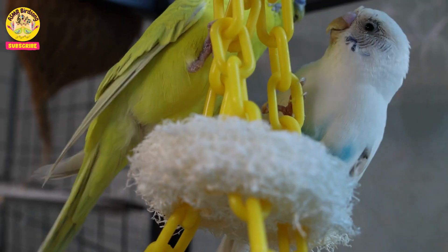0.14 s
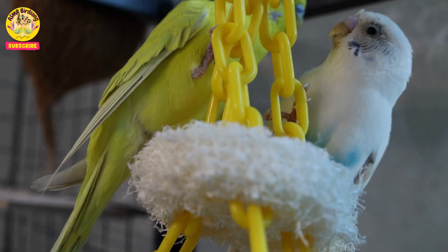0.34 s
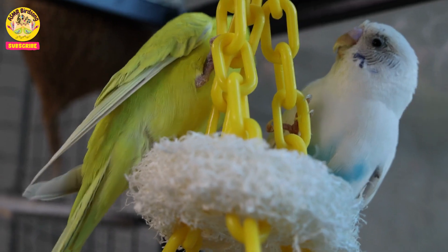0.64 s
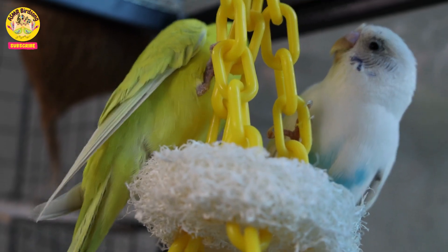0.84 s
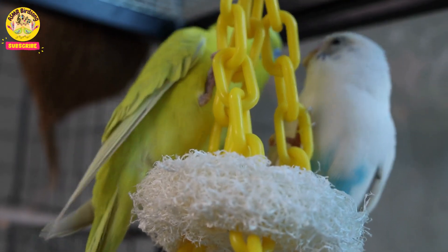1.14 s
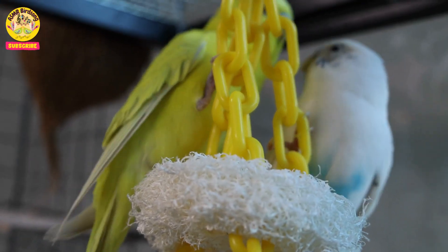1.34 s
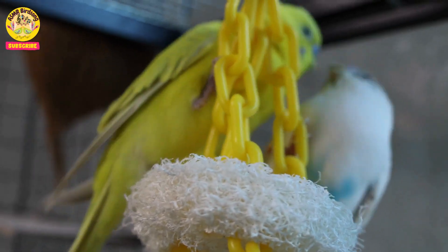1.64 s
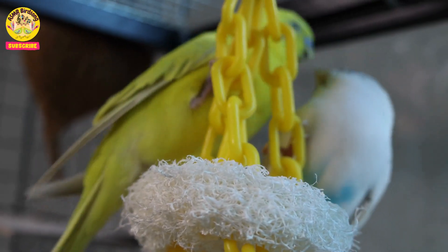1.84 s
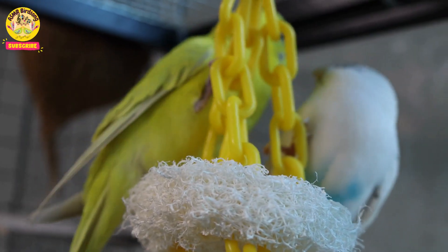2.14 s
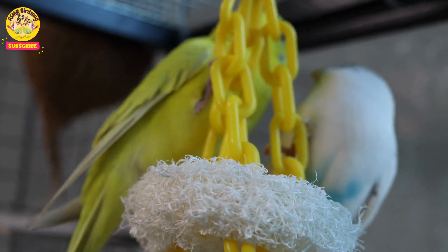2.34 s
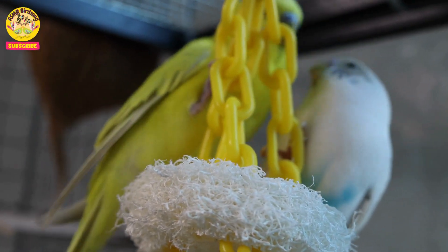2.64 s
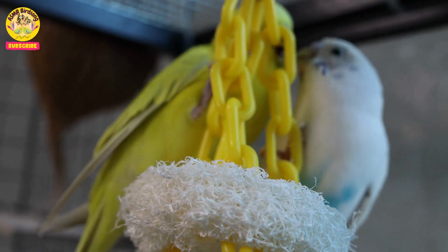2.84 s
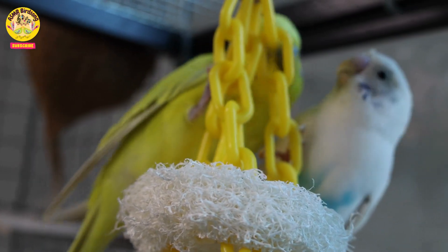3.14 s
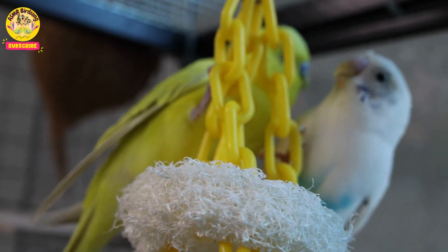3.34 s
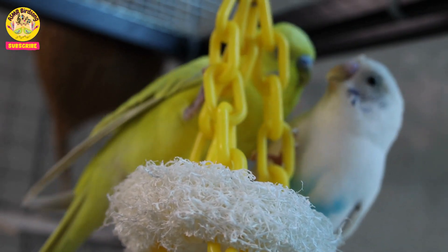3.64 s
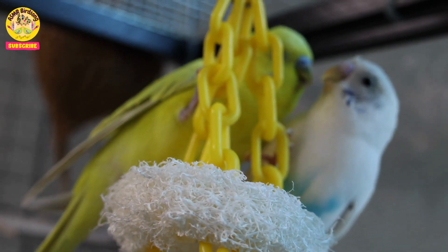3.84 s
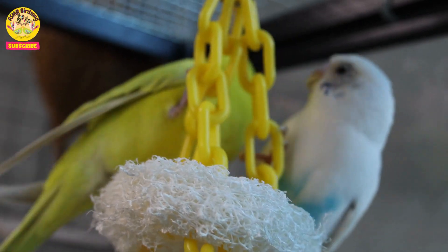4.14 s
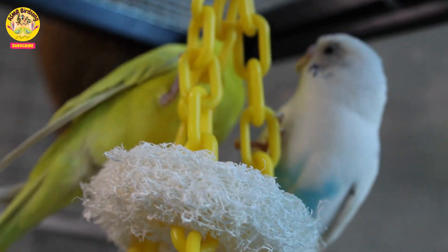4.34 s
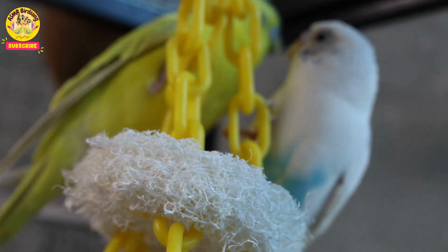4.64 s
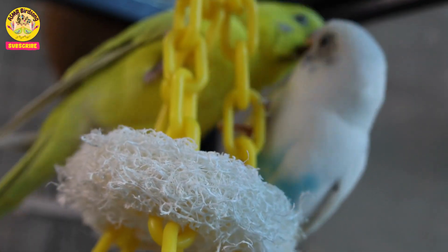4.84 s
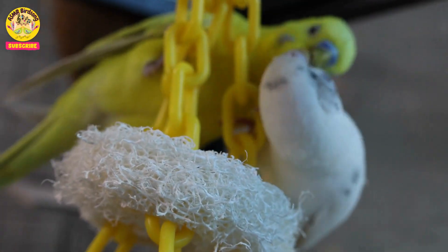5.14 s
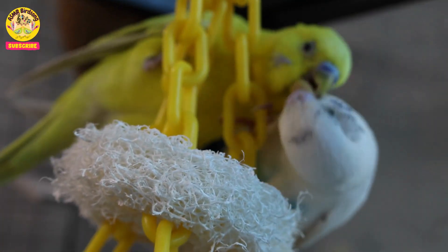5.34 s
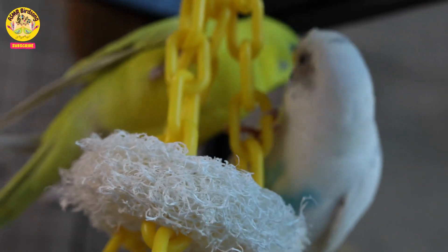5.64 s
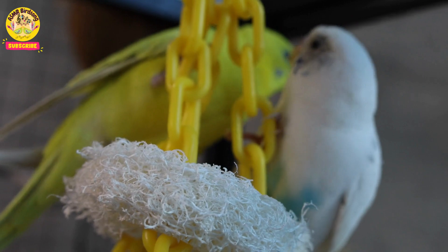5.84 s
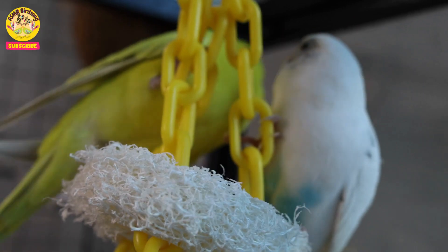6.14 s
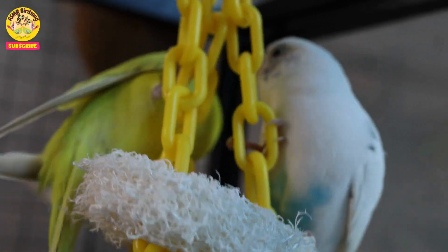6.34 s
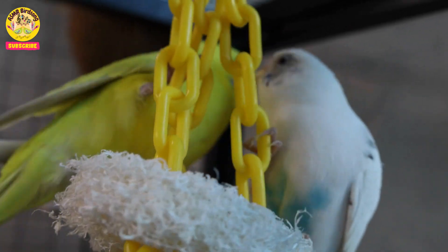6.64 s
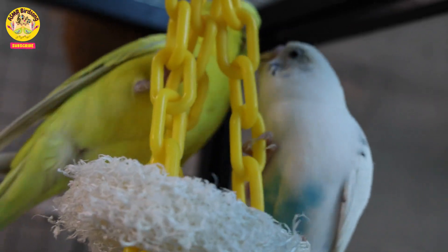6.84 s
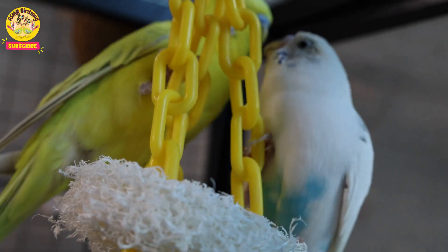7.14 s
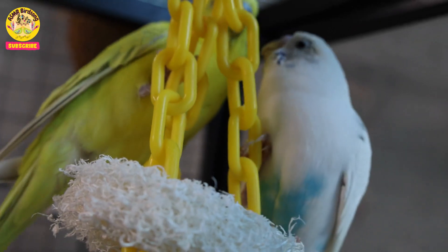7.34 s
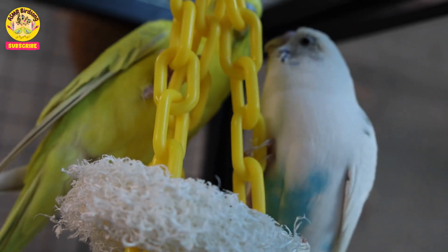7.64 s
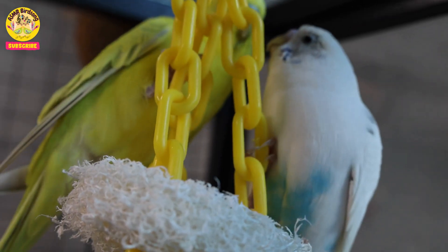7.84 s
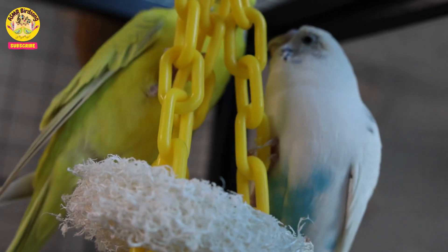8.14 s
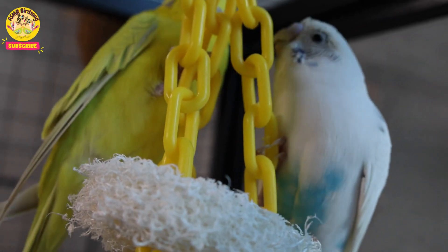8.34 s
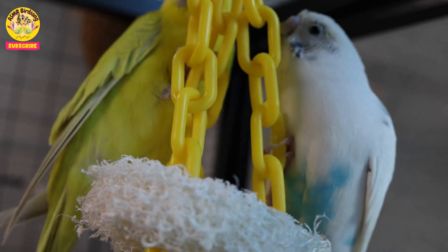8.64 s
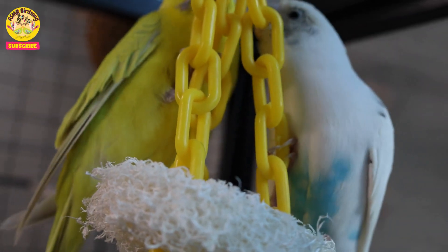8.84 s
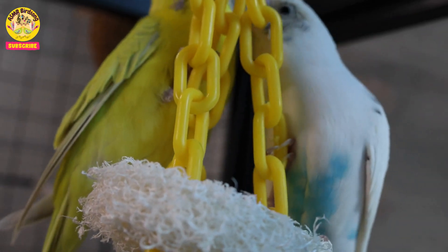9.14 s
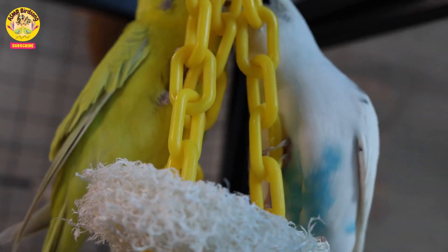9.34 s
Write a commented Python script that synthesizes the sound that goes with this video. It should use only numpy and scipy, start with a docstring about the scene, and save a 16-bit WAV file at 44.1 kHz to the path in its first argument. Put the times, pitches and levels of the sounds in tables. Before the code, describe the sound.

Close, nearly mono sound of small cage birds over low rumble and dull rustling. Sliding chirps come first, then bright, fast whistles with sharp dry clicks between them. After a squawk the voices pause and shuffling takes over. Low nasal babble returns with soft deep thumps of the perch, followed by three short raspy cracks and little clicking runs, with a short room echo.

```python
"""Two budgerigars warble close to a microphone, on a hanging toy in their cage, in a quiet ringing room.
Falling slides open over a low rustle and rumble of coloured noise; dry clicks (short filtered noise puffs) and
soft perch bumps (low dying sines) soon join and return. Grunts, arched chatter, a recurring whistle and freer
whistles follow in quick bouts, then a squawk halfway; all are gliding harmonic tones made hoarse with noise.
Late on come three harsh rasps, uneven pulse trains that ring resonances; the last clicks rattle at the end."""
import sys
import numpy as np
from scipy import signal
from scipy.fft import rfft, irfft, next_fast_len
from scipy.io import wavfile
from scipy.ndimage import map_coordinates

SR = 44100
rng = np.random.default_rng(int(sys.argv[2]) if len(sys.argv) > 2 else 0)


def unload_audio(sound):
    """Save the sound as a 16-bit wav file, at the path given as the first command line argument."""
    columns = np.transpose(np.atleast_2d(sound))
    # keep every value between -1 and 1, then stretch to whole-number steps
    steps = np.round(np.clip(columns, -1, 1) * 32767)
    wavfile.write(sys.argv[1], SR, steps.astype(np.int16))


N = 418509
TOP_HZ = 16300  # nothing sounds above this


def amp(db):
    """Decibels to gain."""
    return 10 ** (np.asarray(db) / 20)


def unit(x):
    """x at rms 1."""
    return x / np.sqrt(np.mean(x ** 2) + 1e-20)


def along(points, hz):
    """(Hz, value) points read on a log frequency axis."""
    f, v = np.transpose(points)
    return np.interp(np.log(hz + 1), np.log(f + 1), v)


def at_time(points, s):
    """(x, value) points read on a straight axis, such as time."""
    return np.interp(s, *np.transpose(points))


def curve(points):
    """(s, value) points drawn out to one value per sample."""
    return at_time(points, np.arange(N) / SR)


def wobble(rate, size):
    """A smooth random curve, rate knots a second."""
    knots = rng.standard_normal(int(size * rate / SR) + 4)
    return map_coordinates(knots, [np.arange(size) * rate / SR])


def add(track, s, x):
    """Mix x into the track at time s."""
    part = track[max(round(s * SR), 0):][:len(x)]
    part += x[:len(part)]


def filtered(x, response):
    """x times a response of frequency."""
    m = next_fast_len(N + 8192)
    return irfft(rfft(x, m) * response(np.fft.rfftfreq(m, 1 / SR)), m)[..., :N]


def noise(colour):
    """Coloured noise of rms 1."""
    return unit(filtered(rng.standard_normal(N), lambda hz: amp(along(colour, hz))))


def ring(colour, size=256):
    """The causal, minimum-phase impulse response of a colour, by folding its cepstrum."""
    cepstrum = irfft(np.log(amp(along(colour, np.fft.rfftfreq(size, 1 / SR))) + 1e-6))
    cepstrum[1:size // 2] *= 2
    cepstrum[size // 2 + 1:] = 0
    return irfft(np.exp(rfft(cepstrum)))


def progress(length):
    """Runs from 0 to 1 over length seconds."""
    return np.linspace(0, 1, max(int(length * SR), 64))


def effort(glide, db_per_octave):
    """Level in dB: the bird pushes hardest at its highest pitch."""
    return db_per_octave * np.log2(glide / glide.max())


def sing(s, glide, level_db, overtones_db, rough, hiss_db=-36,
         waver=0.011, quaver=0.051, jitter=0.13, jitter_rate=900,
         shimmer_db=3, flutter_db=1.68, hoarse_db=-4, airy_db=-30, attack=0.00094, release=0.0041):
    """One syrinx note: a gliding harmonic tone that turns hoarse when the membrane beats unevenly."""
    # treble of the voice: (time [s], level [dB])
    treble = [(0, 4), (.4, -2.5), (.9, 4), (1.5, -8.5), (1.9, 3), (2.5, 0), (3.25, 10), (3.5, 0), (4, 2.5),
              (4.7, 6), (6.9, 7), (7.3, -6), (7.5, -16.5), (8, -5.5)]
    # strength of a partial by where it falls in the throat's passband: (frequency [Hz], level [dB])
    partials = [(600, -0.5), (1050, -0.5), (1400, -5), (2200, 1.5), (3250, 0.5), (4050, -10.5),
                (4800, -20.5), (6000, -21), (7000, -32), (8500, -36), (10500, -41.5), (16000, -54.5)]
    # how the throat colours hoarse noise: (frequency [Hz], level [dB])
    throat = [(400, -17), (1200, -8.5), (2100, 15.5), (3200, 16), (4150, 9), (4900, -10), (6200, -15),
              (8000, -22), (11000, -38.5), (16000, -58.5)]
    # air hissing past the beak: (frequency [Hz], level [dB])
    air_colour = [(1000, -37), (3000, 2.5), (6000, 5), (8000, -12.5), (11000, -14), (16000, -16.5)]

    # hold the last values through part of the release
    overhang = int(0.75 * release * SR)
    glide, level_db, overtones_db, rough = (
        np.pad(np.broadcast_to(c, glide.shape), (0, overhang), 'edge')
        for c in (glide, level_db, overtones_db, rough))
    n = len(glide)
    t = np.arange(n) / SR

    slow_wander = (waver + quaver * rough) * wobble(236.2, n)
    fast_jitter = jitter * rough * wobble(jitter_rate, n)
    phase = 2 * np.pi * np.cumsum(glide * (1 + slow_wander + fast_jitter)) / SR

    treble_db = at_time(treble, s)
    tone = amp(along(partials, glide)) * np.sin(phase)
    # each overtone swells and fades as it glides through the throat's resonances
    for k in range(2, min(int(TOP_HZ / glide.mean()), 14) + 1):
        hz = k * glide
        lift_db = overtones_db * along([(6500, 1), (9000, 0.2)], hz)
        db = lift_db + along(partials, hz) + treble_db * along([(3500, 0.17), (5000, 1)], hz)
        tone += amp(db + flutter_db * wobble(175, n)) * np.sin(k * phase)

    # turbulence passes the membrane in one puff a cycle
    puffs = signal.lfilter(ring(throat), 1, rng.standard_normal(n) * (1 + np.sin(phase)))
    above_pitch = signal.butter(4, 1.13 * glide.min(), 'high', fs=SR, output='sos')
    puffs = signal.sosfilt(above_pitch, puffs)
    tone = unit(tone) + (amp(hoarse_db) * rough + amp(airy_db)) * unit(puffs)
    hiss = unit(signal.lfilter(ring(air_colour), 1, rng.standard_normal(n)))
    tone += amp(hiss_db + treble_db) * hiss

    unsteady = amp(shimmer_db * rough * wobble(571, n) + flutter_db * wobble(175, n))
    gate = np.clip(t / attack, 0, 1) * np.clip((t[-1] - t) / release, 0, 1)
    return s, amp(level_db) * gate * unit(tone * unsteady)


def slides(settle=.036):
    """The pitch falls fast, then settles (time constant in s), and the call fades with it."""
    # (time [s], length [s], first pitch [Hz], last pitch [Hz], level [dB], overtones [dB])
    calls = [(0, 0.066, 1298, 1063, -28.5, 1.5), (.078, .082, 2923, 1127, -9.5, -8.5),
             (0.161, .057, 1090, 1030, -29, -7), (.227, 0.1, 2047, 1233, -22.5, -3.5),
             (0.344, 0.095, 2600, 1327, -15.5, -1.5), (2.423, 0.04, 2330, 1660, -17, -5),
             (3.413, 0.02, 2244, 1776, -15.5, 4), (3.814, .039, 2595, 1966, -9, -2),
             (3.965, 0.016, 2550, 2106, -10, -1), (4.098, 0.021, 2098, 1914, -14, -8.5)]
    for s, length, first_hz, last_hz, db, overtones_db in calls:
        fallen = 1 - np.exp(-length * progress(length) / settle)
        glide = first_hz * (last_hz / first_hz) ** (fallen / fallen[-1])
        level_db = db + effort(glide, db_per_octave=19)
        yield sing(s, glide, level_db, overtones_db, rough=.19, hiss_db=-28.5)


def rustle_level(edge=0.034):
    """Level in dB of the low rustle: each shuffle rises, holds and falls over a light stirring."""
    # rustle between shuffles: (time [s], level before trim [dB])
    stir = [(0, -56), (1.9, -62.5), (2.6, -55.5), (3.6, -50.5), (4.3, -57), (4.8, -55.5), (5.3, -46),
            (6.4, -45), (7.4, -51.5), (7.9, -44), (8.6, -55.5), (9.2, -50), (9.49, -53)]
    # shuffles of the birds on the toy: (time [s], length [s], level before trim [dB])
    shuffles = [(2.593, 0.42, -50), (3.138, .11, -39), (4.866, 0.25, -46.5), (5.169, 0.419, -39),
                (5.622, 0.18, -39), (5.906, .3, -38), (6.123, 0.077, -32), (6.532, .12, -34.5),
                (6.73, 0.17, -39.5), (7.864, 0.095, -38), (8.038, 0.11, -36.5), (8.882, .2, -45)]
    t, gain = np.arange(N) / SR, amp(curve(stir))
    for s, length, db in shuffles:
        ramps = np.clip(np.minimum(t - s, s + length - t) / edge, 0, 1)
        gain = np.maximum(gain, amp(db) * ramps)
    return 20 * np.log10(gain)


def background(rustle_db=1, hiss_db=5.0, rumble_db=2.0, rustle_patchy_db=2.0, grain_db=2,
               rumble_patchy_db=2.26, bright_db=-13, brighten=3.2):
    """A dull uneven rustle that brightens as it swells, the grainy hiss of feathers and the rumble of the room."""
    # fine hiss of feathers, then rumble: (time [s], level before trim [dB])
    feathers = [(0, -56.5), (.5, -53.5), (.7, -61.5), (2.1, -66), (2.5, -60.5), (3.3, -56.5), (4.5, -55.5),
                (5, -52.5), (5.13, -60), (5.23, -48), (5.33, -56), (6.15, -60), (6.4, -56.5), (6.68, -49.5),
                (6.97, -54.5), (7.4, -57.5), (8.1, -60.5), (8.9, -55.5), (9.49, -57.5)]
    rumble_level = [(0, -48.5), (1.2, -55.5), (2, -58.5), (2.9, -46), (3.6, -54.5), (4.7, -53),
                    (5.6, -45.5), (6.3, -48), (6.7, -37), (7.3, -46.5), (8.2, -46), (9.49, -49.5)]
    # noise colours: (frequency [Hz], level [dB])
    rustle_colour = [(80, -11.5), (140, -6), (340, 0), (650, -4.5), (980, 0.5), (1130, -2.5), (1350, -17),
                     (2200, -22.5), (4000, -35), (8000, -38.5)]
    hiss_colour = [(1180, -4.5), (2000, -0.5), (2520, -3), (3520, 2.5), (4320, -1.5), (5840, -4.5),
                   (8220, -8), (15500, -20)]
    rumble_colour = [(12, -47.5), (20, -3), (65, -9), (92, -1.5), (105, -2), (129, -13.5), (156, -13.5),
                     (220, -16), (290, -27.5), (480, -120)]
    edge_colour = [(800, -16.0), (1400, 0.0), (2100, -3.5), (3500, -10.0), (8000, -25.0)]

    low = rustle_level()
    swell = low + rustle_db + rustle_patchy_db * wobble(45, N)
    dull = amp(swell) * noise(rustle_colour)
    # the bright edge moves brighten times as many dB as the dull rustle
    edge_db = low.max() + bright_db + brighten * (swell - low.max())
    edge = amp(edge_db) * noise(edge_colour)
    hiss = amp(curve(feathers) + hiss_db + grain_db * wobble(210, N)) * noise(hiss_colour)
    rumble_swell = curve(rumble_level) + rumble_db + rumble_patchy_db * wobble(6.8, N)
    return dull + edge + hiss + amp(rumble_swell) * noise(rumble_colour)


def clicks(rise=0.00058, soft_hz=6500, size=900, run_loss_db=0.5):
    """Each click is a millisecond puff, soft in the high treble, that rings briefly in the throat and beak."""
    # single clicks of throat and beak: (time [s], level [dB], tilt towards the treble [dB per band],
    # ring of the upper over the lower middle band [dB])
    singles = [(0.072, -15.5, 2.5, 6.5), (.127, -38, 11.5, -9), (0.34, -29, 4, -22),
               (1.097, -31.5, 8.5, -4.5), (1.2524, -49, -1.5, 1.5), (1.8277, -36.5, -5, 11),
               (2.383, -23, -5, 3), (2.3873, -20.5, -1, 23), (2.67, -14.5, 0, 6.5), (2.717, -35, 0, 2),
               (2.8006, -22, 12, -8), (2.8556, -26.5, 8, -15), (2.934, -15.5, 5, 1), (2.963, -33, 10, -8),
               (2.981, -20, 1, 7.5), (3.1244, -20.5, 6, -1), (3.3138, -13.5, 9.5, -11),
               (3.3414, -18.5, 11, 5), (4.7057, -30.5, -3.5, -7), (4.7123, -20, 7.5, 10),
               (5.3244, -52, 19, 5), (5.7985, -37.5, 12, 1), (5.9217, -35, 2.5, 6), (6.0194, -37, 9, -1),
               (6.189, -41, 8.5, 9), (6.4863, -34, 8, -4), (6.8192, -28.5, -4, 6),
               (7.4255, -19.5, -4.5, -10), (7.9802, -28.5, -13, -10), (8.747, -35.5, -12.5, -9),
               (8.7583, -33, -1, -7), (8.8397, -30.5, -5.5, -4), (8.85, -40, -11, 0),
               (8.888, -30, -6.5, -5), (8.9657, -35, -1, 0), (8.9935, -36, -12.5, 9), (9.06, -31, 5, -3),
               (9.14, -26.5, -6.5, -5), (9.1495, -32, -10, 8), (9.187, -30, -2, 5)]
    # quick runs of clicks: (time [s], level of the first [dB], tilt [dB per band], count, spacing [s])
    rattles = [(2.1845, -30, -3, 3, .0078), (3.0845, -15, 5, 2, 0.0032), (3.6635, -22, -0.5, 2, 0.005),
               (3.8065, -20.5, 1, 2, 0.0063), (3.9287, -24.5, -3, 3, 0.007),
               (4.078, -19.5, -0.5, 3, 0.0042), (7.727, -38, -14, 2, 0.0048),
               (8.5715, -23, -6.5, 2, 0.0043), (8.857, -27, -5, 2, .004), (9.2476, -23.5, -2.5, 4, 0.0065),
               (9.284, -34.5, -10.5, 2, 0.0055), (9.3605, -25, -5, 4, 0.0057),
               (9.3985, -20.5, -3, 3, 0.0054)]
    # bands that ring: (low edge [Hz], high edge [Hz])
    click_bands = [(500, 1350), (1450, 2800), (2800, 4450), (5100, 15000)]
    # level of each band in a click without tilt or ring: one value a band [dB]
    band_db = [-14.5, -2, -2.5, -15.5]

    track, t = np.zeros(N), np.arange(size) / SR
    bands = [signal.butter(5, edges, 'band', fs=SR, output='sos') for edges in click_bands]
    soften = signal.butter(3, soft_hz, fs=SR, output='sos')
    puff = t / rise * np.exp(-t / rise)

    # each click of a run is a little weaker than the one before
    runs = [(s + k * spacing, db - k * run_loss_db, tilt, 0)
            for s, db, tilt, count, spacing in rattles for k in range(round(count))]
    steps = np.arange(len(bands)) - (len(bands) - 1) / 2  # bands counted from the middle
    middle = abs(steps) < 1
    for s, click_db, tilt, ring_db in list(singles) + runs:
        levels = click_db + np.array(band_db) + (tilt + ring_db * middle) * steps
        for band, db in zip(bands, levels):
            part = signal.sosfilt(np.vstack([band, soften]), puff * rng.standard_normal(size))
            # the level is the rms over three milliseconds
            add(track, s, amp(db) * part / np.linalg.norm(part) * np.sqrt(.003 * SR))
    return track


def bumps():
    """The perch gives a few low swings that swell fast and die away."""
    # soft bumps of the swinging perch: (time [s], level at the peak [dB], mean pitch [Hz], length scale [s])
    knocks = [(0.126, -37, 97, 0.064), (0.516, -39, 92, 0.084), (0.536, -46, 45, 0.09),
              (0.843, -38.5, 94, 0.028), (2.36, -35.5, 65, 0.069), (2.629, -30.5, 94, 0.056),
              (6.515, -32, 90, 0.064), (6.595, -44, 40, 0.092), (6.721, -33, 89, 0.13),
              (7.709, -22.5, 99, 0.135), (7.744, -27.5, 55.6, 0.14), (8.039, -22, 91, 0.077),
              (8.214, -25, 91.4, 0.06), (8.304, -28, 89, 0.064), (8.411, -31.5, 57, 0.042),
              (8.662, -29.5, 50.7, 0.066)]
    track = np.zeros(N)
    for s, db, hz, length in knocks:
        n = int(2 * length * SR)
        u = np.arange(n) / (0.28 * length * SR)  # 1 at the peak
        phase = 2 * np.pi * np.cumsum(hz * (1 + 0.069 * wobble(40, n))) / SR
        add(track, s, amp(db) * np.sqrt(2) * (u * np.exp(1 - u)) ** 2 * np.sin(phase))
    return track


def grunts():
    """Low, rough notes that sag."""
    # (time [s], length [s], first pitch [Hz], last pitch [Hz], level [dB])
    notes = [(0.331, 0.0069, 1160, 926, -18.5), (2.172, .011, 644, 568, -19), (2.245, 0.031, 894, 595, -16),
             (2.514, .011, 937, 796, -17.5), (7.009, .013, 660, 630, -17.5), (7.45, 0.026, 888, 823, -16.5),
             (7.632, .016, 877, 594, -14), (7.827, 0.021, 897, 677, -12.5)]
    for s, length, first_hz, last_hz, db in notes:
        glide = first_hz * (last_hz / first_hz) ** progress(length)
        level_db = db + effort(glide, db_per_octave=22.5)
        yield sing(s, glide, level_db, overtones_db=2.5, rough=0.72, hiss_db=-14)


def chatter(arch_octaves=0.1175):
    """Nasal syllables, each a small arch in pitch and loudness, its ends arch_octaves under its middle."""
    # (time [s], length [s], middle pitch [Hz], fall [octaves], level [dB], overtones [dB])
    syllables = [(.815, 0.024, 2000, -0.11, -32.5, 8), (1.101, 0.021, 2180, -.1, -19.5, 8),
                 (1.497, .024, 1718, -.15, -14.5, 5), (1.52, .018, 1568, .18, -14.5, 8.5),
                 (1.832, 0.0064, 3780, .1, -20, -8), (2.283, 0.054, 1200, -0.135, -25, 6.5),
                 (2.324, 0.0434, 1236, 0.058, -20.5, 10), (2.395, 0.015, 2130, -0.233, -22.5, 6),
                 (2.746, .022, 3580, -0.12, -32.5, -4), (3.685, 0.0186, 1880, -0.3, -14, -5.5),
                 (3.71, 0.016, 1583, .3, -20.5, -6.5), (3.731, .03, 1110, 0.37, -22, -1.5),
                 (3.763, 0.025, 1244, -0.43, -21, 0), (3.855, 0.023, 1702, -.15, -23, -7),
                 (3.879, .03, 1500, .1, -28, -7), (3.951, .01, 2780, 0.034, -22.5, 8),
                 (3.988, 0.0293, 1626, .05, -24.5, -9.5), (4.019, 0.049, 1456, 0, -25.5, -3),
                 (4.122, 0.035, 1809, -0.225, -21, -2.5), (6.833, .039, 1117, 0, -19.5, -2.5),
                 (6.875, .063, 1111, .18, -18, -9), (7.028, 0.0099, 1370, .1, -24.5, 0),
                 (7.047, .028, 1184, -0.2, -21.5, -2), (7.075, .04, 983, 0.052, -20.5, -6.5),
                 (7.112, 0.041, 972, 0, -22, -3.5), (7.165, .035, 1625, 0.4, -21, -3.5),
                 (7.202, .04, 1033, 0.15, -21.5, -5), (7.241, 0.028, 1064, 0.092, -21, -3.5),
                 (7.282, .02, 1435, .35, -24, -4), (7.3, 0.0322, 1214, .05, -22, -7),
                 (7.332, .029, 1162, 0, -21.5, -4.5), (7.429, 0.022, 1460, 0, -15.5, 7),
                 (7.501, 0.011, 1120, -0.22, -19, -3), (7.514, .025, 1213, 0.64, -17, 2.5),
                 (7.545, 0.019, 1282, 0, -19.5, 2.5), (7.567, .028, 1376, .1, -18, -3),
                 (7.619, 0.013, 1377, -.15, -16.5, 3), (7.651, 0.012, 1323, -.2, -22.5, -1.5),
                 (7.704, 0.011, 1670, 0.19, -23.5, -19), (7.805, 0.019, 1453, .05, -14, -1),
                 (7.877, 0.018, 1660, 0.052, -21, -4), (7.983, 0.0256, 1480, 0.023, -25.5, -5)]
    # (time [s], roughness [0-1])
    roughness = [(.8, 0.3), (1.1, .05), (1.5, 0.23), (2.3, 0.18), (3.7, .27), (4.1, 0.31), (6.85, 0.16),
                 (7.3, 0.18), (7.6, .17), (7.8, 0.4), (8, 0.6)]
    for s, length, hz, fall, db, overtones_db in syllables:
        u = progress(length)
        glide = hz * 2 ** (fall * (.5 - u) - arch_octaves * (2 * u - 1) ** 2)
        level_db = db + effort(glide, db_per_octave=6)
        yield sing(s, glide, level_db, overtones_db, at_time(roughness, s), hiss_db=-24)


def motifs():
    """The favourite whistle scoops, leaps up, drops, climbs and flicks, stretched a little differently each time."""
    # melody: (share of the stretched length, pitch over the top pitch)
    melody = [(0, .84), (.12, .765), (.245, .81), (.32, .98), (.48, 1), (.53, .7), (.63, .57), (.88, 0.84),
              (.93, 0.83), (1, .73)]
    # the tone breaks at the fast turns: (share of the stretched length, roughness [0-1])
    roughness = [(0, .08), (.3, .08), (.46, .14), (.54, 0.4), (.64, 0.35), (.72, 0.19), (.87, 0.2),
                 (.92, 0.7), (1, 0.71)]
    # renditions: (time [s], length [s], time of the drop within it [s], top pitch [Hz], depth of the swings,
    # level [dB], swell [dB per octave], fade after the drop [dB], overtones [dB])
    renditions = [(.845, 0.13, 0.069, 3353, 1, -8.5, 19, 0, 2.5),
                  (1.127, .117, .055, 3380, 1, -9.5, 13, 2.5, 5),
                  (3.44, .115, .049, 3450, .8, -6, 15, 12.5, 5.5)]
    for s, length, drop, hz, depth, db, swell_db, fade_db, overtones_db in renditions:
        # stretched so that the drop falls at one half
        u = np.interp(progress(length), [0, drop / length, 1], [0, .5, 1])
        glide = hz * at_time(melody, u) ** depth
        level_db = db + effort(glide, swell_db) - fade_db * np.clip(2 * u - 1, 0, 1)
        yield sing(s, glide, level_db, overtones_db, at_time(roughness, u), hiss_db=-32)


def whistles():
    """Clear whistles that wander freely in pitch."""
    # one curve a whistle, each a list of (time [s], pitch [Hz], level [dB], overtones [dB])
    free_curves = [
        [(1.389, 3220, -19.5, -3), (1.4, 3200, -25.5, -1.5), (1.403, 3480, -21, 10), (1.413, 1807, -18, 5)],
        [(1.418, 2990, -21, 9), (1.432, 2700, -9, 9.5), (1.449, 2600, -14.5, 0.5), (1.455, 3404, -5.5, 0),
         (1.466, 3300, -14, -3), (1.472, 2876, -18.5, 11), (1.487, 2900, -4, 4), (1.493, 2970, -14, 16),
         (1.497, 2790, -26, -3.5)],
        [(1.847, 3380, -5.5, -6), (1.859, 3515, -5, -8.5), (1.866, 3335, -31, 2), (1.87, 2790, -29, 24.5),
         (1.89, 2767, -12, 19), (1.904, 2840, -32.5, 14.5), (1.911, 3395, -16.5, 12), (1.921, 2450, -35, 13)],
        [(2.531, 2855, -7.5, 15.5), (2.536, 3190, -14, 26.5), (2.547, 2490, -16.5, 12), (2.563, 3670, -13, 3),
         (2.565, 1970, -20.5, 6), (2.571, 2530, -23, 3), (2.58, 2520, -19, 11)],
        [(3.21, 1990, -6, -6.5), (3.224, 1770, -23, -6.5), (3.236, 1587, -19.5, -14), (3.26, 1415, -25, -14),
         (3.275, 1580, -29, -15), (3.29, 2000, -24, -1)],
    ]
    for points in free_curves:
        times, *columns = np.transpose(points)
        length = times[-1] - times[0]
        now = times[0] + length * progress(length)
        glide, db, overtones_db = (np.interp(now, times, c) for c in columns)
        yield sing(times[0], glide, db, overtones_db, rough=0.18)


def squawk(arch_octaves=.08):
    """Arched bursts, pushed so hard that the tone breaks up."""
    # (time [s], length [s], first pitch [Hz], last pitch [Hz], level [dB], overtones [dB], roughness [0-1])
    bursts = [(4.616, 0.028, 2350, 2050, -17, 8, 0.5), (4.646, 0.016, 2080, 2173, -10.5, 4.5, 0.7),
              (4.664, 0.0134, 2380, 1910, -17, 3, 0.9), (4.68, 0.018, 1975, 1814, -16, 10, 0.4),
              (4.709, .009, 2280, 2455, -10, 17.5, .85), (4.718, 0.025, 2067, 1590, -7.5, 19, 0.7)]
    for s, length, first_hz, last_hz, db, overtones_db, rough in bursts:
        u = progress(length)
        glide = first_hz * (last_hz / first_hz) ** u * 2 ** (arch_octaves * np.sin(np.pi * u))
        level_db = db + effort(glide, db_per_octave=26.5)
        yield sing(s, glide, level_db, overtones_db, rough, hiss_db=-26, attack=.003, jitter=.07)


def warble():
    """All sung syllables leave through the open beak, which colours them."""
    # colour of the open beak: (frequency [Hz], level [dB])
    beak = [(500, -7), (900, 0), (4100, 0.5), (5000, -9.5), (5900, 1), (7000, 5.5), (9000, -4.5),
            (14000, -14)]
    song = np.zeros(N)
    for kind in (slides, grunts, chatter, motifs, whistles, squawk):
        for s, sound in kind():
            add(song, s, sound)
    return signal.fftconvolve(song, ring(beak))[:N]


def rasps(scatter=0.23, hoarse_db=-9, crack_life=0.0015, droop=0.11, uneven_db=3, onset=0.00041):
    """A crack opens each rasp; then uneven pulses slow down while the throat's resonances sink."""
    # (time [s], length [s], level [dB], fade over the rasp [dB], opening crack [dB],
    # first and last pulse rate before scatter [Hz])
    harsh_calls = [(8.1508, 0.026, -8.5, 9.5, -5, 602, 314.6),
                   (8.3751, 0.021, -13, 2.1, -1.5, 745.6, 401.7),
                   (8.5338, .018, -13.5, 1.8, -4.5, 765, 481)]
    # resonances that ring: (frequency midway [Hz], width [Hz], level [dB])
    modes = [(2034, 135, -3), (2967, 200, 4.5), (3710, 250, 3)]
    # colour of the crack and the hoarse air: (frequency [Hz], level [dB])
    crack_colour = [(300, -36), (700, -23), (1300, -4.5), (2200, -4.5), (4000, 2), (5000, -11.5),
                    (6300, -11.5), (8000, -35.5), (15000, -46)]

    track, colour = np.zeros(N), ring(crack_colour)
    for s, length, db, fade_db, crack_db, first_hz, last_hz in harsh_calls:
        n = int(length * SR)
        t = np.arange(n) / SR
        rate = np.geomspace(first_hz, last_hz, n) * np.exp(scatter * wobble(500, n))
        pulse = np.diff(np.floor(np.cumsum(rate) / SR), prepend=-1) > 0
        age = t - np.maximum.accumulate(t * pulse)  # time since the last pulse
        sink = 1 + droop * (.5 - t / length)

        buzz = np.zeros(n)
        for hz, width, level in modes:
            strength = amp(level + uneven_db * wobble(336, n))
            buzz += strength * np.exp(-np.pi * width * age) * np.sin(2 * np.pi * hz * sink * age)
        buzz *= 1 - np.exp(-age / onset)

        air = unit(signal.lfilter(colour, 1, rng.standard_normal(n)))
        body = amp(db - fade_db * t / length) * (unit(buzz) + amp(hoarse_db) * air)
        crack = amp(crack_db) * np.exp(-(t / crack_life) ** 2) * air
        closing = np.clip((length - t) / 0.0058, 0, 1)
        add(track, s, closing * (body + crack))
    return track


def room(x, wet_db=-17, near_db=-20, near_life=0.014, build=0.0026):
    """Near surfaces answer within milliseconds; the room's tail fades at its own speed at each frequency."""
    # (frequency [Hz], time to fade by 60 dB [s])
    fade_times = [(200, 0.24), (1200, .5), (3000, 0.39), (6000, 0.41), (12000, 0.2)]
    hz, t, z = signal.stft(rng.standard_normal(int(.7 * SR)), SR, nperseg=256)
    fading = z * amp(-60 * t / along(fade_times, hz)[:, None])
    tail = signal.istft(fading, SR, nperseg=256)[1]
    t = np.arange(len(tail)) / SR
    tail = tail * (1 - np.exp(-t / build))
    near = rng.standard_normal(len(t)) * np.exp(-t / near_life) * (t > .001)
    echo = amp(wet_db) * tail / np.linalg.norm(tail) + amp(near_db) * near / np.linalg.norm(near)
    return x + signal.fftconvolve(x, echo)[:N]


def scene(width_db=-62, side_echo_db=-30):
    """Everything sits in the centre; only a faint hiss and a trace of echo differ between the ears."""
    birds = warble() + clicks() + rasps()
    mid = room(birds) + bumps() + background()
    wide_hiss = noise([(100, 19.5), (1000, -0.5), (4000, -8.5), (8000, 6.5), (15000, 15.5)])
    wide_echo = room(birds) - birds  # a second, independent echo
    side = amp(width_db) * wide_hiss + amp(side_echo_db) * wide_echo
    return np.array([mid + side, mid - side])


def record(dry, hardness=8):
    """The sharpest peaks are rounded at full scale, and nothing passes above the band limit."""
    rounded = dry / (1 + np.abs(dry) ** hardness) ** (1 / hardness)
    return filtered(rounded, lambda hz: hz < TOP_HZ)


dry = scene()
out = record(dry)
unload_audio(out)
```